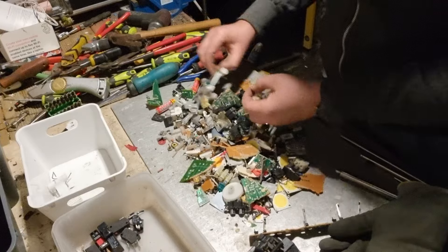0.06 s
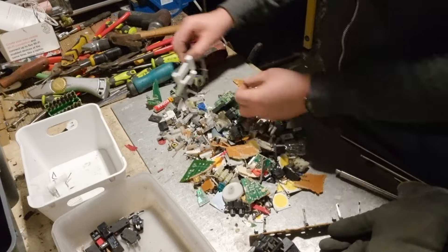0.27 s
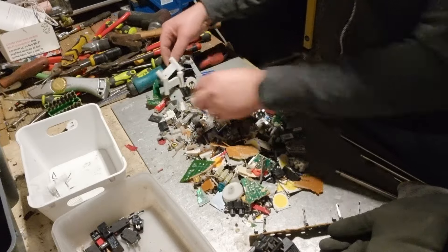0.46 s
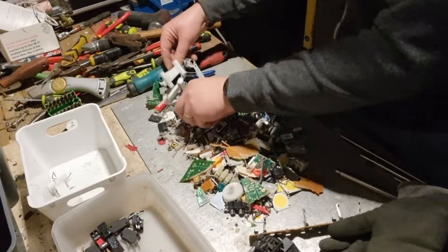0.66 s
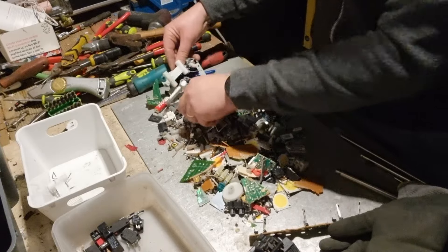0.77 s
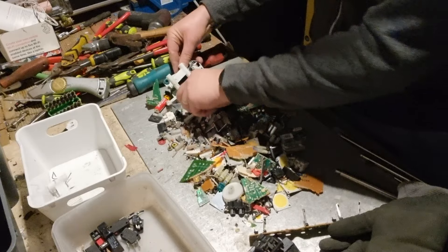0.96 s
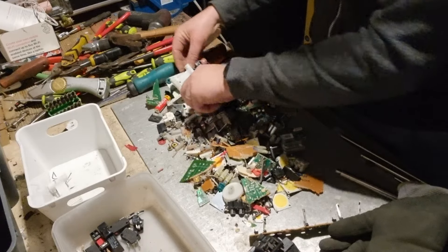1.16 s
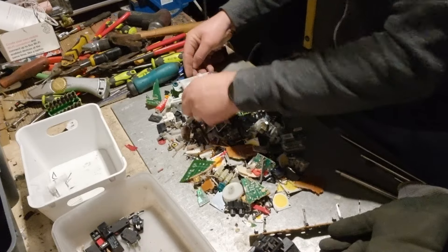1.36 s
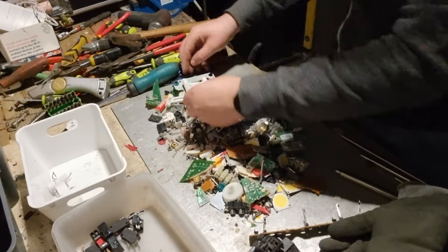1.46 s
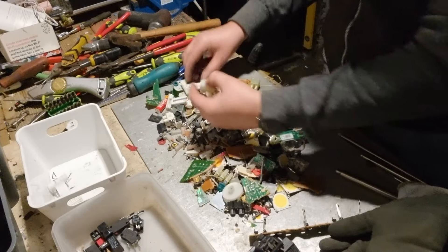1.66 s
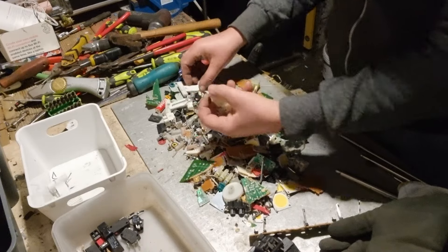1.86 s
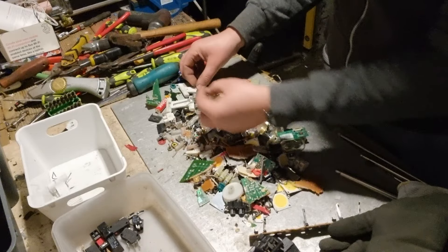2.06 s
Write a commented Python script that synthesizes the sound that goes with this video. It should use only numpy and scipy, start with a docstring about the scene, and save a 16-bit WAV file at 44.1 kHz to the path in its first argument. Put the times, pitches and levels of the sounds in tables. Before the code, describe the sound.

Small pieces of circuit board, plastic and metal click and scrape as hands sort a pile on a metal bench. One snaps down sharply early on, then lighter clatter follows, heard close in stereo in a quiet workshop.

```python
"""Small workshop: hands sort electronic scrap on a metal bench, close to a stereo microphone.
Bits of board, plastic and metal click, scrape and shift; each contact rings the bits and the bench top.
A tiny metal part pings, a bracket rattles, one piece snaps down hard, a board taps, a housing knocks.
Dragged boards resonate as they slip. The bench booms softly under the hands, over a low room hush."""
import sys
import numpy as np
from scipy import signal
from scipy.fft import rfft, irfft
from scipy.io import wavfile

SR = 44100
rng = np.random.default_rng(int(sys.argv[2]) if len(sys.argv) > 2 else 0)


def generate_wav(sig):
    """Save sig (samples, or channels by samples) to the path in sys.argv[1] as 16-bit PCM at SR."""
    pcm = np.round(np.clip(np.atleast_2d(sig).T, -1, 1) * 32767).astype(np.int16)
    wavfile.write(sys.argv[1], SR, pcm)


N = 92610
RING_T = np.arange(SR // 4) / SR

# room hush spectrum (frequency [Hz], level [dB])
HUSH_EQ = [(15, -40.5), (25, -26), (82, -6), (120, -6.5), (180, -13.5), (911, -35), (1070, -32),
           (2550, -34.5), (2990, -26), (16000, -55)]
# contact colour (frequency [Hz], gain [dB])
CONTACT_EQ = [(100, -20.5), (250, 4.5), (380, 0), (520, 4), (1100, 2), (2000, 1), (3300, 6), (5500, 4),
              (7600, 2), (8400, -12), (10500, -12), (13500, -6.5), (16000, -13)]
# left/right likeness (frequency [Hz], correlation [-])
CORRELATION = [(100, 0.88), (600, 0.77), (1100, 0.68), (2200, 0.33), (5000, 0.07), (14000, -0.04)]
# microphone balance (frequency [Hz], left minus right [dB])
BALANCE = [(250, -2.5), (550, 2), (1100, -3), (2200, 0.5), (4500, -2.5), (8000, -2), (14000, -0.5)]

# modes of the bench and the pieces (frequency [Hz], level [dB], t60 [s])
BOOM_MODES = [(64, -5, .24), (78, 0, .29), (123, -11, .16), (170, -11, .14)]
BENCH_TOP_MODES = [(265.3, -14.5, 0.19), (320.4, -21.5, 0.14), (498.8, -2.5, 0.13), (683.6, 4.5, 0.058),
                   (905.5, -7, 0.12), (1052.4, 4.5, 0.08), (1210, -4.5, 0.13), (1731, 0, 0.081),
                   (2143, 2, 0.041), (4330, 3.5, 0.038), (5537, 4.5, 0.045), (7280, 4, 0.08)]
PING_MODES = [(7330, 2, .045), (7810, 0, .08), (12020, -8, .09)]
BRACKET_MODES = [(3130, -4, .16), (3635, 0, .12), (3995, -2, .095)]
SNAP_MODES = [(3640, -7, .095), (5320, 0, .07), (5425, -3, .06), (7380, -5, .07)]
TAP_MODES = [(1723, -0.5, 0.047), (2100, 0, 0.018)]
HOUSING_MODES = [(255, -14, .25), (500, -3, .17), (585, -6, .1), (672, 0, .13), (752, -1, .1),
                 (1765, -2, .1)]

# hands pressing on the bench (time [s], level [dB])
THUMPS = [(0.591, -39.5), (0.655, -54), (0.786, -50), (1.018, -50), (1.395, -53), (1.852, -56.5)]
# rustle of the shifting pile (time [s], bass [dB], middle [dB], treble [dB])
RUSTLE = [(0.022, -51, -42.5, -54), (0.09, -61.5, -56, -65), (0.17, -54, -45.5, -59.5),
          (0.249, -43, -39, -44), (0.32, -51.5, -53, -61), (0.392, -52, -38, -47), (0.508, -56.5, -57, -75),
          (0.566, -39, -50, -51.5), (0.697, -56.5, -56, -65), (0.788, -46.5, -36.5, -51.5),
          (0.858, -54, -60, -64.5), (0.931, -43.5, -41, -56), (1.01, -57, -59, -73),
          (1.07, -47.5, -63, -60), (1.109, -57.5, -56.5, -64.5), (1.17, -50.5, -45, -51.5),
          (1.27, -48.5, -43.5, -48), (1.33, -42.5, -45.5, -56), (1.398, -46, -41, -49),
          (1.47, -63, -57, -70), (1.552, -59.5, -50, -59), (1.619, -73.5, -79, -75.5),
          (1.744, -70.5, -69.5, -73.5), (1.769, -46.5, -47, -52), (1.87, -53.5, -51.5, -62),
          (2.09, -51.5, -52, -60.5)]
# boards dragged through the pile (time [s], length [s], resonance [Hz], width [Hz], level [dB])
DRAGS = [(1.295, .09, 2250, 800, -44), (1.31, .11, 1020, 420, -46), (1.423, .034, 4290, 90, -42),
         (1.489, .028, 4280, 220, -45)]
# one piece scraping over others (time [s], length [s], bass [dB], middle [dB], treble [dB])
SCRAPES = [(0.107, 0.018, -49, -41.5, -47.5), (0.408, 0.0017, -65, -32, -31), (0.636, 0.013, -78, -52, -47),
           (0.7348, 0.0075, -44, -41, -45.5), (0.918, 0.007, -44, -40, -50.5),
           (0.955, 0.01, -43.5, -30, -29.5), (1.023, 0.031, -47.5, -38.5, -45.5),
           (1.428, 0.012, -50.5, -44, -49), (1.5, .02, -50.5, -48.5, -46.5), (1.758, 0.0096, -74, -51, -64),
           (1.809, 0.034, -46.5, -40.5, -48), (1.968, 0.0098, -45.5, -41.5, -52)]
# knocks of a loose bracket being picked up (time [s], level [dB])
BRACKET_KNOCKS = [(.111, -43), (.203, -45), (.2305, -37), (.2365, -37), (.3565, -40)]
# single contacts (time [s], bass [dB], middle [dB], treble [dB])
CLICKS = [(0.046, -55, -41, -45.5), (0.203, -47.5, -39.5, -52), (0.2312, -42.5, -32, -43),
          (0.236, -42, -29.5, -41.5), (0.264, -49, -39.5, -46), (0.3556, -38, -31.5, -69),
          (0.379, -33.5, -53, -56), (0.383, -37.5, -48, -49), (0.4128, -32.5, -19, -17),
          (0.549, -51, -39.5, -55.5), (0.61, -46.5, -84, -73), (0.673, -46, -68, -55),
          (0.7602, -40.5, -31, -48), (0.769, -35, -28.5, -44), (0.7825, -35, -47, -51),
          (0.822, -72, -47, -52), (0.939, -51, -35, -40), (1.043, -48.5, -33.5, -42), (1.17, -41, -41, -51),
          (1.176, -66, -36, -42), (1.22, -35.5, -33.5, -39), (1.228, -42, -36.5, -60),
          (1.255, -57, -55, -40.5), (1.341, -41, -36.5, -34.5), (1.358, -42, -40, -48),
          (1.402, -45, -49, -40.5), (1.4898, -49, -39.5, -37.5), (1.56, -48, -42, -51.5),
          (1.646, -67.5, -54.5, -75), (1.776, -45.5, -51, -57), (1.796, -57, -35, -78),
          (1.802, -31.5, -31.5, -41), (1.814, -38, -54, -40.5), (1.826, -39, -62, -57),
          (1.8365, -61, -39, -48), (2.031, -56, -44, -60), (2.045, -46, -40.5, -52)]
# bare cracks of the hardest contacts (time [s], level [dB])
CRACKS = [(.4135, -7), (.7702, -18)]

BAND_EDGES_HZ = (170, 1800, 7900, 16500)  # bass, middle, treble
RISE_TAU_S, CRACK_TAU_S, SCATTER_TAU_S, ATTACK_WINDOW_S = .00025, .0008, .008, .008
SCATTER_DB, BITS_DB, BENCH_DB, BENCH_VARY_DB, ROOM_DB = -10, -16.5, -16.5, 3, -19
BITS_T60_S, ROOM_BASS_T60_S, ROOM_TREBLE_T60_S = .074, .19, .13
HARD_CORNER_HZ, SOFT_DB_PER_OCTAVE = 12000, 16
TOUCHES_PER_S, TOUCH_SPREAD_DB = 330, 2.2
SLIPS_PER_S, SLIP_SPREAD_DB = 2000, 4


def undb(db):
    """Decibels to gain."""
    return 10 ** (np.asarray(db) / 20)


def unit(x):
    """Scale to rms 1."""
    return x / np.sqrt(np.mean(x ** 2) + 1e-20)


def at_bins(table, size):
    """Interpolate a table over log frequency at the FFT bins."""
    hz, value = np.array(table, float).T
    bins_hz = np.arange(size // 2 + 1) * SR / size
    return np.interp(np.log(bins_hz + 1), np.log(hz), value)


def equalise(x, table):
    """Filter by a (frequency [Hz], gain [dB]) table."""
    size = 2 * x.shape[-1]
    return irfft(rfft(x, size) * undb(at_bins(table, size)), size)[..., :size // 2]


def stereo(pair):
    """Two unrelated signals to left and right: alike in the bass, unlike in the treble."""
    size = pair.shape[-1]
    correlation = at_bins(CORRELATION, size)
    mid, side = rfft(pair) * np.sqrt([(1 + correlation) / 2, (1 - correlation) / 2])
    return irfft(np.array([mid + side, mid - side]), size)


def band(x, index):
    """Band-pass: 0 bass, 1 middle, 2 treble."""
    sos = signal.butter(2 + 2 * index, BAND_EDGES_HZ[index:index + 2], "band", fs=SR, output="sos")
    return signal.sosfilt(sos, x)


def fade(t60_s, t=RING_T):
    """Exponential decay, 60 dB in t60_s."""
    return np.exp(-np.log(1000) * t / t60_s)


def ring(modes):
    """Struck modes, random phase in each of two channels."""
    phases = rng.uniform(0, 2 * np.pi, (len(modes), 2, 1))
    return sum(undb(db) * fade(t60_s) * np.sin(2 * np.pi * hz * RING_T + phase)
               for (hz, db, t60_s), phase in zip(modes, phases))


def add(out, x, at_s):
    """Mix x in at at_s."""
    start = int(at_s * SR)
    out[:, start:start + x.shape[-1]] += x[..., :N - start]


def grains(size, per_s, spread_db):
    """Random impulses of uneven strength and sign."""
    hits = rng.random(size) < per_s / SR
    strength = undb(spread_db * np.minimum(rng.exponential(size=size), 4))
    return hits * strength * rng.choice([-1, 1], size)


def contact():
    """One touch in three bands: crack, clutter reflections, ring of bits and bench top, room tail."""
    crack, scatter, room = rng.standard_normal((3, 2, len(RING_T)))
    bits = [(900 + 14000 * pitch ** 2, -8 * weakness, BITS_T60_S * (.5 + sustain))
            for pitch, weakness, sustain in rng.random((16, 3))]
    # mode levels depend on the spot struck
    bench = [(hz, db + BENCH_VARY_DB * rng.uniform(-1.83, 1), t60_s) for hz, db, t60_s in BENCH_TOP_MODES]
    near = crack * np.exp(-RING_T / CRACK_TAU_S)
    near += undb(SCATTER_DB) * scatter * np.exp(-RING_T / SCATTER_TAU_S)
    near += undb(BITS_DB) * ring(bits) / np.sqrt(len(bits) / 3)
    near += undb(BENCH_DB) * ring(bench) / 2
    near *= 1 - np.exp(-RING_T / RISE_TAU_S)
    room_t60s = np.geomspace(ROOM_BASS_T60_S, ROOM_TREBLE_T60_S, 3)
    tails = [undb(ROOM_DB) * room * fade(t60_s) for t60_s in room_t60s]
    return [band(equalise(stereo(near + tail), CONTACT_EQ), k) for k, tail in enumerate(tails)]


def mix_bands(bands, levels_db, window_s):
    """Sum the bands, each at its rms level over the first window_s; soft contacts get a duller middle."""
    bass, middle, treble = bands
    _, middle_db, treble_db = levels_db
    octaves = np.clip((treble_db - middle_db) / SOFT_DB_PER_OCTAVE, -2, 0)
    middle = signal.lfilter(*signal.butter(1, HARD_CORNER_HZ * 2 ** octaves, fs=SR), middle)
    return sum(undb(db) * x / np.sqrt(np.mean(x[:, :int(window_s * SR)] ** 2) + 1e-20)
               for x, db in zip((bass, middle, treble), levels_db))


def room_hush(level_db=-64):
    """Steady workshop noise, mostly bass."""
    noise = stereo(rng.standard_normal((2, N)))
    return undb(level_db) * unit(equalise(noise, HUSH_EQ))


def bench_thumps(rise_tau_s=.0043):
    """Soft pushes excite the bench's low modes."""
    out = np.zeros((2, N))
    t = np.arange(SR) / SR
    boom = sum(undb(db) * fade(t60_s, t) * np.sin(2 * np.pi * hz * t) for hz, db, t60_s in BOOM_MODES)
    boom *= 1 - np.exp(-t / rise_tau_s)
    for at_s, db in THUMPS:
        add(out, undb(db) * boom, at_s)
    return out


def pile_rustle(pieces=12):
    """Small bits shift under the fingers, each with its own ring."""
    out = np.zeros((2, N))
    times_s, *levels_db = np.array(RUSTLE).T
    gains = [undb(np.interp(np.arange(N) / SR, times_s, db)) for db in levels_db]
    for _ in range(pieces):
        touches = unit(grains(N, TOUCHES_PER_S / pieces, TOUCH_SPREAD_DB)) / np.sqrt(pieces)
        for x, gain in zip(contact(), gains):
            response = unit(x) / np.sqrt(len(RING_T))
            out += signal.fftconvolve(response, (touches * gain)[None])[:, :N]
    return out


def board_drags():
    """Dense slips excite one resonance of a sliding board."""
    out = np.zeros((2, N))
    for at_s, length_s, hz, width_hz, db in DRAGS:
        slips = np.array([grains(len(RING_T), SLIPS_PER_S, SLIP_SPREAD_DB) for _ in range(2)])
        body = unit(signal.lfilter(*signal.iirpeak(hz, hz / width_hz, fs=SR), slips))
        swell = np.sin(np.pi * np.minimum(RING_T / length_s, 1)) ** .5
        add(out, undb(db) * body * swell, at_s)
    return out


def scrapes():
    """An edge slips over other pieces in a quick run of catches."""
    out = np.zeros((2, N))
    for at_s, length_s, *levels_db in SCRAPES:
        slips = grains(len(RING_T), SLIPS_PER_S, SLIP_SPREAD_DB)[:int(length_s * SR)]
        slips[0] = 1
        bands = [signal.fftconvolve(x, slips[None]) for x in contact()]
        add(out, mix_bands(bands, levels_db, length_s + ATTACK_WINDOW_S), at_s)
    return out


def struck_pieces():
    """Five pieces ring in their own modes."""
    out = np.zeros((2, N))
    tick = band(rng.standard_normal((2, len(RING_T))), 2) * fade(t60_s=.026)
    add(out, undb(-37) * (ring(PING_MODES)[0] + undb(5) * tick), at_s=.1445)  # tiny metal part
    for at_s, db in BRACKET_KNOCKS:
        add(out, undb(db) * ring(BRACKET_MODES), at_s)
    add(out, undb(-18) * ring(SNAP_MODES), at_s=.4135)  # stiff piece snaps down
    add(out, undb(-34.5) * ring(TAP_MODES)[0], at_s=.61)  # small board taps down
    add(out, undb(-30) * ring(HOUSING_MODES)[0], at_s=1.802)  # hollow plastic housing set down
    return out


def clicks():
    """Pieces knock on each other and the bench; the hardest hits add a bare crack."""
    out = np.zeros((2, N))
    for at_s, *levels_db in CLICKS:
        add(out, mix_bands(contact(), levels_db, ATTACK_WINDOW_S), at_s)
    for at_s, db in CRACKS:
        burst = band(rng.standard_normal((2, len(RING_T))), 1)
        add(out, undb(db) * unit(burst) * np.exp(-RING_T / CRACK_TAU_S), at_s)
    return out


def scene():
    """Scrap and bench over the workshop hush."""
    hush = room_hush()
    scrap = clicks() + scrapes() + pile_rustle() + struck_pieces() + board_drags()
    return hush + bench_thumps() + scrap


def record(dry, ceiling=.95, top_hz=15900):
    """Stereo microphone: slight left/right colour, soft clip, low-pass."""
    channels = np.array([equalise(x, [(hz, side * db / 2) for hz, db in BALANCE])
                         for x, side in zip(dry, (1, -1))])
    clipped = ceiling * np.tanh(channels / ceiling)
    return signal.sosfilt(signal.ellip(10, .2, 80, top_hz, fs=SR, output="sos"), clipped)


dry = scene()
out = record(dry)
generate_wav(out)
```